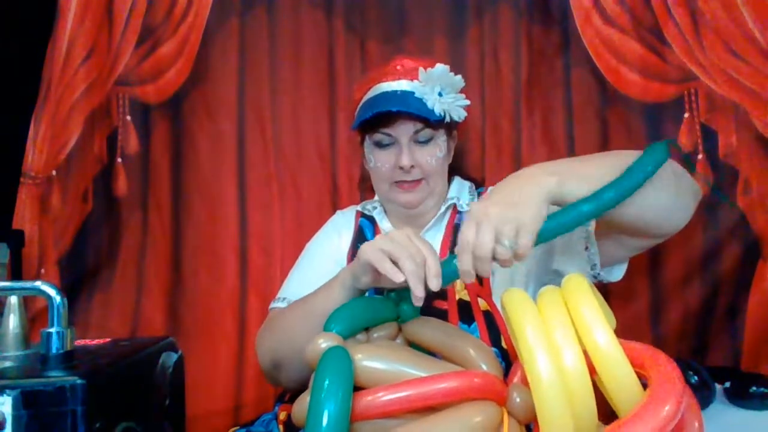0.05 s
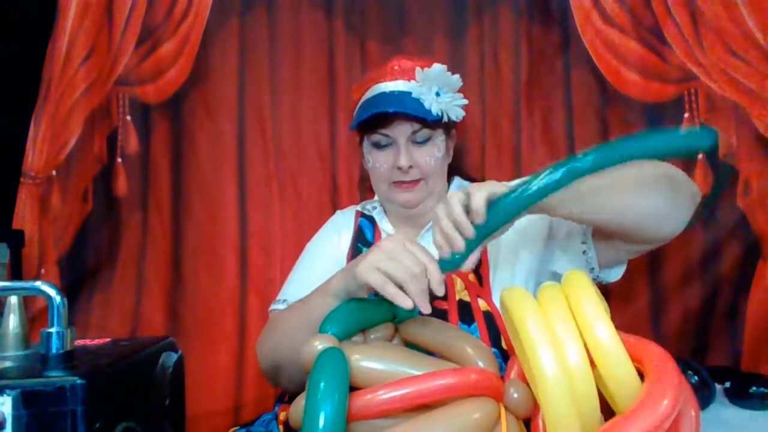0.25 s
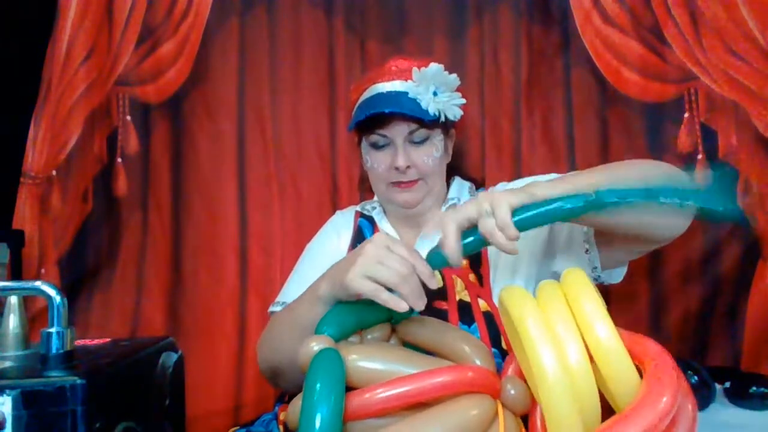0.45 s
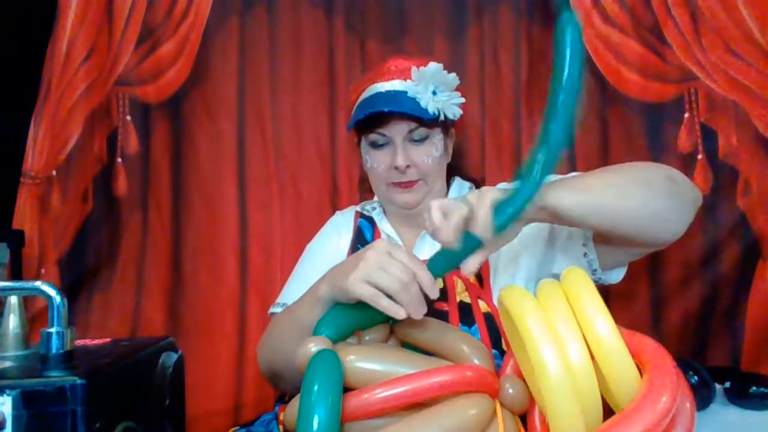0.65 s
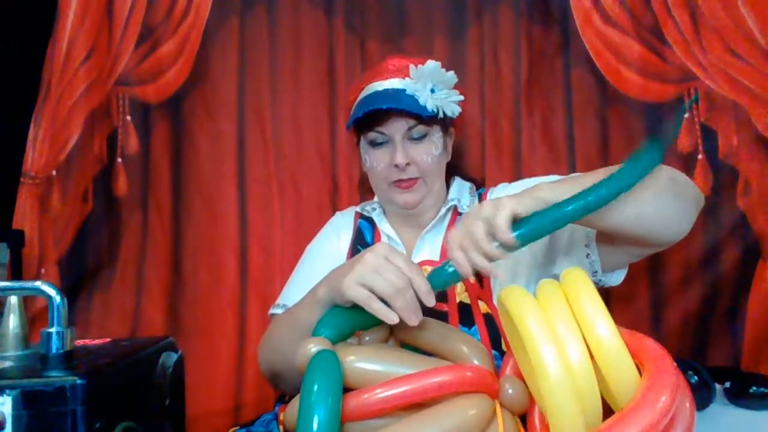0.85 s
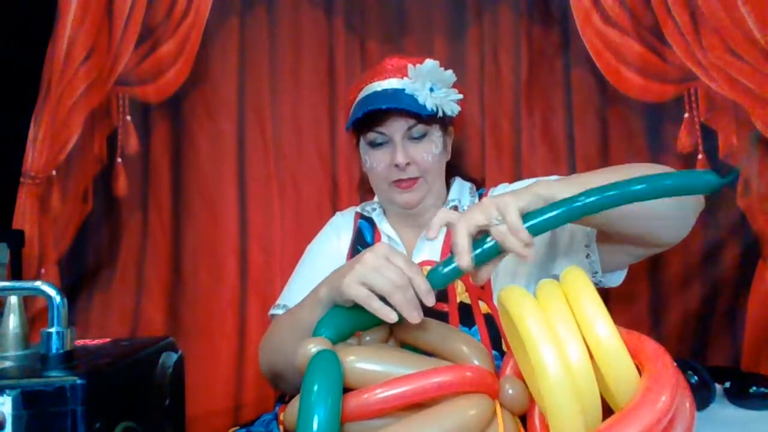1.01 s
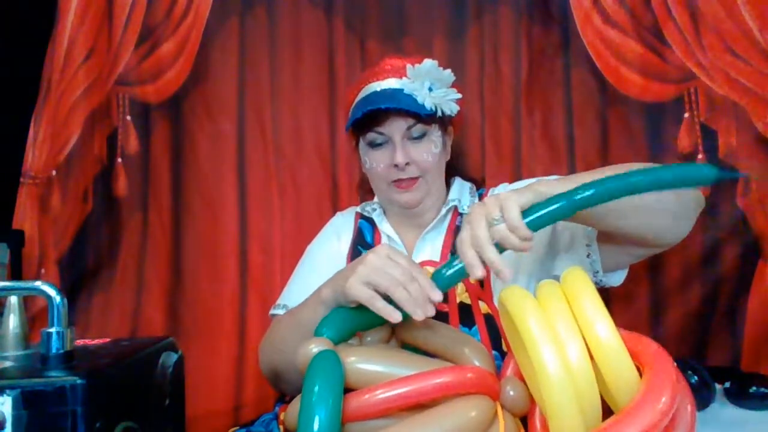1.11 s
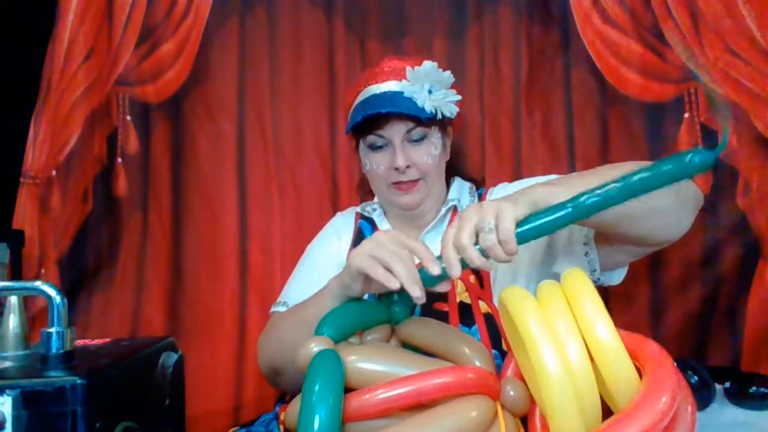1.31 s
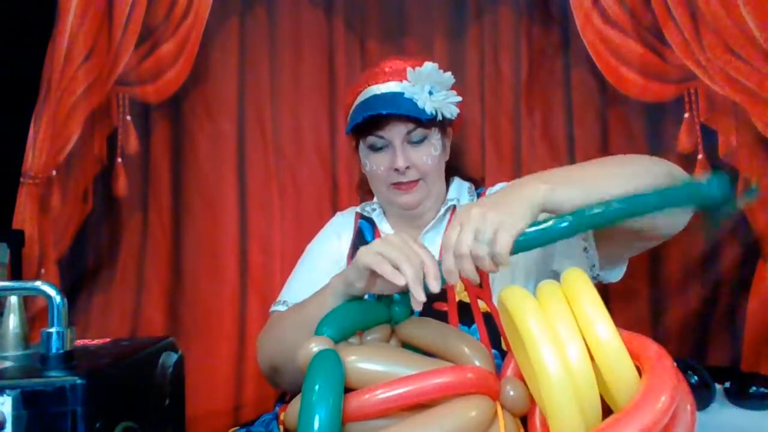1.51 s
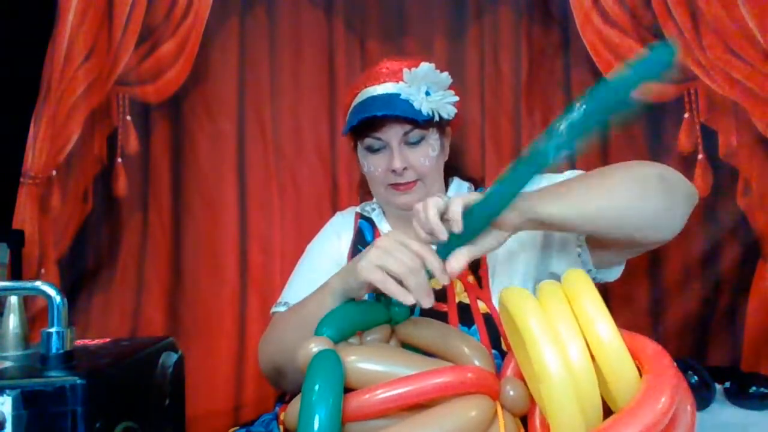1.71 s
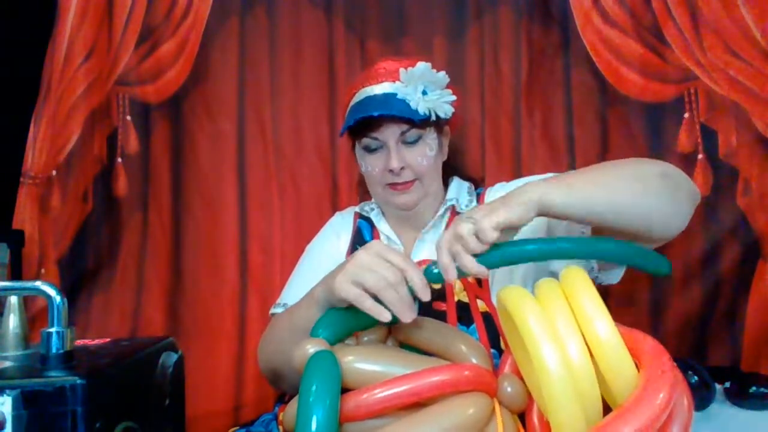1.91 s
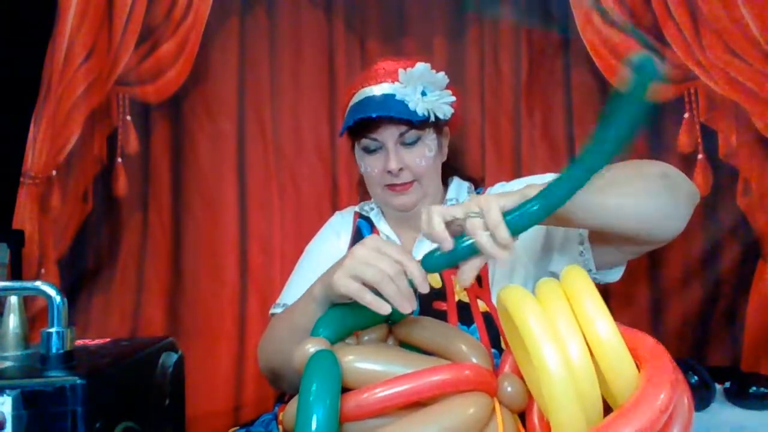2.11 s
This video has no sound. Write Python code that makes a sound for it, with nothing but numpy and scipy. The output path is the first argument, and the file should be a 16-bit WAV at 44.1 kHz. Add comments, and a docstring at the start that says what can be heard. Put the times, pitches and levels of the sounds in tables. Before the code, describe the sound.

Fingers drag and squeeze a tight latex balloon, rasping and crumpling; a sharp snap leads to a strong hollow pop-like slip, then a tiny squeak, uneven crackles and softer thumps, close and dry in a curtained room.

```python
"""A long latex balloon is squeezed and twisted close to a microphone in a small, curtained room.
Fingers drag over the skin from the start: many tiny filtered clicks make a grainy hiss, rasp and crumple.
Crackles (short noise bursts) soon join, then slips: pitched thumps with skin noise and duller bounces.
Next come a hard snap and the first hollow pings, both made of sine tones, and the loudest slip at 0.42 s.
A thin squeak of filtered noise passes at 0.85 s; more crackles and slips follow, and rubbing ends it."""
import sys
import numpy as np
from scipy import signal
from scipy.fft import rfft, irfft
from scipy.io import wavfile
from scipy.ndimage import uniform_filter1d

SR = 44100
rng = np.random.default_rng(int(sys.argv[2]) if len(sys.argv) > 2 else 0)


def transcribe(u):
    """Save the signal u as a 16-bit wav file named by the first command-line argument.

    u: samples, shape (n,) or (channels, n), limited to [-1, 1]; the rate is SR.
    q: integer samples, one column per channel.
    """
    v = np.clip(np.atleast_2d(u).T, -1, 1)
    q = np.round(v * 32767).astype(np.int16)
    wavfile.write(sys.argv[1], SR, q)


N = 94815  # length in samples, 2.15 s
TAPS = 4096  # samples in a colour filter
FREQS = np.fft.rfftfreq(TAPS, 1 / SR)

# faint hiss that differs between the ears: (frequency [Hz], relative level [dB])
SIDE_COLOUR = [(30, 8), (2500, -1.5), (16000, 9)]
SIDE_MAX_DB, SIDE_HALF_DB = -73, -70.0  # upper limit; loudness of the middle that gives half of it
FLOOR_DB = -94.5
ROOM_T60_S, ROOM_DB = 0.077, -15  # time to fade by 60 dB; level of the tail
BAND_LIMIT_HZ = 15900

# thin squeaks: (time [s], length [s], pitch [Hz], level [dB])
SQUEAKS = [(0.845, 0.0183, 8760, -41.5)]
SQUEAK_WIDTH_HZ = 2100

# pings of the air in the balloon: (time [s], level [dB], pitch [Hz], time to fade by 60 dB [s])
AIR_RINGS = [(0.368, -30.5, 509, 0.047), (.4202, -28.5, 2036, 0.15), (1.814, -41, 1790, 0.035),
             (1.8165, -44, 1993, 0.083), (1.8895, -33.5, 947, 0.043), (1.8925, -34.5, 2020, 0.047)]
RING_RISE_S = 0.001

# the rubbing over time: (time [s], hiss before its boost [dB], rasp [dB], low body [dB])
RUB_LEVELS = [(0.0, -54.5, -61, -90), (0.047, -57, -57, -54.5), (0.07, -71, -62, -65),
              (0.131, -57.5, -53, -52.5), (0.189, -60, -55, -53.5), (0.225, -55.5, -49.5, -45),
              (0.287, -44.5, -53.5, -76), (0.323, -70, -65, -69.5), (0.363, -57, -45, -55),
              (0.412, -57, -63.5, -60), (0.421, -53, -47, -41), (0.474, -57.5, -58, -50),
              (0.521, -50.5, -47.5, -50.5), (0.56, -59.5, -63.5, -101), (0.595, -51, -50, -88),
              (0.651, -72.5, -78.5, -78), (0.676, -56.5, -83, -64), (0.736, -55, -49.5, -61),
              (0.752, -60, -66, -80), (0.776, -100, -105, -91), (0.806, -54.5, -52.5, -51),
              (0.847, -48, -60, -73.5), (0.866, -60.5, -67, -81), (0.906, -46, -69, -88),
              (0.925, -61, -68.5, -50), (0.953, -57, -54, -60), (0.978, -79, -75.5, -70.5),
              (1.028, -57, -82, -100), (1.064, -66.5, -77.5, -84), (1.094, -92, -82, -76),
              (1.103, -54.5, -49.5, -49.5), (1.215, -49, -56, -54.5), (1.24, -69, -68.5, -111),
              (1.259, -57, -51.5, -54), (1.305, -55.5, -59.5, -109), (1.327, -64.5, -65.5, -77),
              (1.347, -55, -50.5, -53), (1.378, -49, -53.5, -55), (1.398, -61.5, -62.5, -89),
              (1.436, -74, -66, -95), (1.472, -52, -50, -98), (1.482, -64, -62.5, -91),
              (1.545, -63.5, -63, -58), (1.587, -49, -49.5, -49.5), (1.628, -55, -61.5, -74),
              (1.681, -43, -52, -83), (1.706, -61, -58, -55), (1.762, -54, -78, -73.5),
              (1.792, -70, -63.5, -61.5), (1.816, -53, -50.5, -49), (1.884, -74, -67.5, -68),
              (1.887, -72, -53, -42), (1.943, -60.5, -63, -73), (1.98, -58, -56, -54.5),
              (2.018, -61, -69, -99), (2.079, -76.5, -78, -83), (2.092, -60.5, -60, -64.5),
              (2.148, -64.5, -67, -72)]
HISS_BOOST_DB = 3.5
# hiss where finger meets skin: (frequency [Hz], relative level [dB])
HISS_COLOUR = [(1700, -21.5), (2500, 2.5), (3400, -3), (4600, -10), (5800, -17), (7200, -9.5), (8300, -3),
               (9700, 2), (11000, -9), (12600, 0.5), (14300, 4), (16000, -2.5)]
# rasp of the skin: (frequency [Hz], relative level [dB])
RASP_COLOUR = [(500, -40.5), (1000, -2.5), (1400, -6.5), (1750, 0.5), (2600, 0.5), (3800, -6.5),
               (5000, -11), (9500, -16), (16000, -32)]
# low body, before the bubble shapes it: (frequency [Hz], relative level [dB])
BODY_COLOUR = [(90, -25.5), (160, 1.5), (900, -3), (1500, -6.5), (4000, -47.5)]
# resonance of the pinched bubble, which follows the squeeze: (time [s], pitch [Hz])
BUBBLE_PITCH = [(0.05, 473), (0.22, 380), (0.5, 402.5), (1.105, 619.1), (1.13, 380), (1.17, 290),
                (1.215, 553), (1.265, 861), (1.34, 520), (1.55, 520), (1.59, 333), (1.71, 470),
                (1.86, 375.5), (2.11, 462)]
BUBBLE_WIDTH_HZ = 304
PATCH_DB = 2.3  # strength of the shifts in colour

# sharp, bright ticks: (time [s], level [dB])
SNAPS = [(0.2204, -26), (1.6741, -38)]
# tones within each snap: (frequency [Hz], relative level [dB])
SNAP_MODES = [(2400, -0.5), (3380, 0.5), (4480, -3), (5300, -7.5), (7900, -12), (9400, -4.5)]
SNAP_PEAK_S = 0.00075

# crackles: (time [s], level [dB], tilt above 2 kHz [dB per octave])
CRACKLES = [(0.0796, -45, 0), (0.1268, -35, 1), (0.14, -40, -1), (0.1766, -39, -4.5), (0.2055, -36.5, 4),
            (.2200, -25.5, 0), (0.2475, -32, 5), (0.3033, -39.5, -1.5), (0.3623, -28.5, 3.5),
            (0.42, -32, 6), (0.4854, -37.5, -6), (0.4926, -35.5, -3.5), (.588, -36.5, -5), (0.719, -32, 16),
            (1.135, -36.5, -2), (1.1389, -38.5, 3), (1.172, -44, -4), (1.2672, -34.5, 2), (1.2575, -43, -8),
            (1.2989, -38, 0.5), (1.351, -38, -7), (1.3558, -29, 2.5), (1.37, -39, -1.5),
            (1.4118, -37.5, 3.5), (1.4355, -32.5, 3.5), (1.4398, -31.5, 4), (1.4619, -33.5, -2),
            (1.5287, -36.5, -2), (1.5585, -33, -2.5), (1.6736, -33, 1), (1.6998, -35, 0.5),
            (1.8902, -34, -3)]
# crackles before the tilt: (frequency [Hz], relative level [dB])
CRACKLE_COLOUR = [(60, -49), (200, -31.5), (700, -10.5), (1300, 1.5), (2400, 5.5), (3600, -1), (5600, -2),
                  (9500, -0.5), (11000, -8), (13000, 0), (16000, -2)]
CRACKLE_RISE_S, CRACKLE_DECAY_S = 0.00015, 0.0011
CRACKLE_TAIL_S, CRACKLE_TAIL_DB = 0.011, -14.5
CRACKLE_CLICK = 3.0  # height of the first click over the burst that follows

# slips: (time [s], thump [dB], pitch [Hz], time to peak [s], skin noise [dB])
SLIPS = [(.1755, -38, 463, 0.0017, -41), (0.4199, -11, 560, 0.001, -25.5), (.6755, -34, 550, 0.0012, -46),
         (0.6992, -39, 594, 0.00063, -44), (.7195, -38.5, 690, 0.00314, -37),
         (0.7235, -23, 443, 0.002, -39), (0.729, -33, 243, 0.0033, -54), (0.8024, -29.5, 670, 0.0013, -40),
         (0.9233, -34.5, 595, 0.0019, -61), (0.9278, -41.5, 186, 0.004, -60.5),
         (1.1014, -30, 647, 0.002, -38.5), (1.162, -42.5, 300, 0.0041, -57.5),
         (1.4625, -44.5, 1270, 0.00062, -61), (1.558, -30, 568, 0.00265, -29),
         (1.8125, -28, 431.4, .0018, -42.5), (1.831, -40.5, 208, 0.00428, -52),
         (1.848, -39, 222, 0.00224, -46.5), (1.8922, -33, 570, .0027, -36.5),
         (1.902, -36.5, 286, 0.00344, -50), (1.967, -45, 360, 0.00337, -56.5)]
# skin noise of a slip: (frequency [Hz], relative level [dB])
SKIN_COLOUR = [(60, -33.5), (200, 2), (700, 1), (1400, -4.5), (2200, -4.5), (3200, -10), (5000, -21),
               (7000, -22), (9500, -15), (11000, -24), (15000, -14)]
SKIN_DECAY_S = 0.0056  # time to fall to 1/e
# bounces of each slip: (delay [s], level before dulling [dB])
BOUNCES = [(.0088, -24.5), (0.0123, -15), (.019, -24.5), (.0275, -28.5), (0.0398, -38.5)]
BOUNCE_HZ = 624  # bounces fade out above this


def amp(db):
    """Turns decibels into gain."""
    return 10 ** (np.asarray(db) / 20)


def unit(x):
    """Scales to an average (rms) strength of 1."""
    return x / np.sqrt(np.mean(x ** 2) + 1e-20)


def read(points, hz):
    """Reads a colour table between its points, on a log-frequency axis."""
    f, value = np.transpose(points)
    return np.interp(np.log(hz + 1), np.log(f + 1), value)


def add(mix, s, sound):
    """Mixes in a sound at time s, cut off at the end of the mix."""
    part = mix[max(round(s * SR), 0):][:len(sound)]
    part += sound[:len(part)]


def colour(x, db):
    """Filters with the given dB at FREQS; the filter has energy 1 and never acts ahead of time."""
    both_halves = np.r_[db, db[-2:0:-1]]
    # the Hilbert transform finds the phase that lets the filter respond at once
    response = np.exp(np.conj(signal.hilbert(np.log(amp(both_halves)))))
    h = irfft(response[:len(db)])
    return signal.fftconvolve(x, h / np.linalg.norm(h))[:len(x)]


def wander(rate_hz):
    """Smooth random ups and downs of rms 1, slower than about rate_hz."""
    spectrum = rfft(rng.standard_normal(N))
    slow = 1 + (np.fft.rfftfreq(N, 1 / SR) / rate_hz) ** 4
    return unit(irfft(spectrum / slow, N))


def grit(size):
    """Dense clicks of random sign and even strength."""
    return rng.choice([-1., 1.], size)


def low_cut(x, hz):
    """The balloon radiates little bass."""
    return signal.sosfilt(signal.butter(4, hz, "high", fs=SR, output="sos"), x)


def resonate(x, hz, width_hz):
    """A resonance whose pitch follows the curve hz."""
    turn = np.exp(2j * np.pi * np.cumsum(hz) / SR)
    r = np.exp(-np.pi * width_hz / SR)
    # shift the pitch down to zero, smooth, then shift it back up
    smoothed = signal.lfilter([1 - r], [1, -r], x / turn)
    return (turn * smoothed).real


def noise_floor():
    """A very faint, steady hiss, the same in both ears."""
    return amp(FLOOR_DB) * rng.standard_normal(N)


def side_hiss(mid):
    """A faint hiss that differs between the ears and sinks when the middle is quiet."""
    level = uniform_filter1d(abs(mid), size=900)  # average over 20 ms
    hiss = colour(rng.standard_normal(N), read(SIDE_COLOUR, FREQS))
    return amp(SIDE_MAX_DB) * hiss * level / (level + amp(SIDE_HALF_DB))


def room(x):
    """The curtains leave only a short, faint tail: noise that dies away."""
    t = np.arange(SR // 4) / SR
    tail = grit(len(t)) * np.exp(-np.log(1000) * t / ROOM_T60_S)
    tail = tail / np.linalg.norm(tail)
    return x + amp(ROOM_DB) * signal.fftconvolve(x, tail)[:N]


def squeaks():
    """A fingertip chatters briefly at a high, fuzzy pitch: noise around one frequency."""
    out = np.zeros(N)
    for s, length, hz, db in SQUEAKS:
        t = np.arange(0, length, 1 / SR)
        peak_db = -20 * np.log10(1 + (2 * (FREQS - hz) / SQUEAK_WIDTH_HZ) ** 2)
        tone = unit(colour(grit(len(t)), peak_db))
        add(out, s, amp(db) * tone * np.sin(np.pi * t / length))
    return out


def rings():
    """The enclosed air gives short hollow pings: sine tones that die away."""
    out, t = np.zeros(N), np.arange(SR // 4) / SR
    for s, db, hz, t60 in AIR_RINGS:
        fade = np.minimum(t / RING_RISE_S, 1) * np.exp(-np.log(1000) * t / t60)
        add(out, s, amp(db) * fade * np.sin(2 * np.pi * hz * t))
    return out


def shifting(x):
    """The colour shifts in random patches of time and pitch as the fingers move over the skin."""
    z = signal.stft(x, nperseg=256, noverlap=192)[2]
    patches = rng.standard_normal(z.shape)
    for _ in range(2):
        patches = uniform_filter1d(patches, size=5, axis=0)  # blur over pitch
        patches = uniform_filter1d(patches, size=14, axis=1)  # blur over time
    gain = unit(amp(PATCH_DB * unit(patches)))
    return signal.istft(z * gain, nperseg=256, noverlap=192)[1][:N]


def friction(spectrum, grip, per_s, spread_db, grip_db, smooth):
    """Tiny stick-slip releases of uneven size over a smooth slide, both stronger with more grip."""
    size = amp(spread_db * np.minimum(rng.exponential(1, N), 4))
    happens = rng.random(N) < per_s / SR
    grains = unit(grit(N) * size * happens)
    slide = smooth * rng.standard_normal(N)
    drive = (grains + slide) * amp(grip_db * grip)
    return unit(colour(drive, read(spectrum, FREQS)))


def rubbing():
    """Fingers drag on latex: hiss at the contact, rasp of the skin, hollow crumple in the pinched bubble."""
    s, *levels = np.transpose(RUB_LEVELS)
    t = np.arange(N) / SR
    hiss_gain, rasp_gain, body_gain = (amp(np.interp(t, s, level)) for level in levels)
    grip = wander(96)
    hiss = friction(HISS_COLOUR, grip, per_s=4800, spread_db=3.5, grip_db=3.0, smooth=0.7)
    rasp = friction(RASP_COLOUR, grip, per_s=700, spread_db=2.0, grip_db=2.5, smooth=0.51)
    flutter = friction(BODY_COLOUR, grip, per_s=680, spread_db=1.5, grip_db=1.5, smooth=0.65)
    bubble_hz = np.interp(t, *np.transpose(BUBBLE_PITCH))
    crumple = unit(resonate(flutter, bubble_hz, BUBBLE_WIDTH_HZ))
    return amp(HISS_BOOST_DB) * hiss_gain * hiss + rasp_gain * rasp + body_gain * crumple


def snaps():
    """A sharp, bright tick rings at several pitches at once for a few milliseconds."""
    out, t = np.zeros(N), np.arange(TAPS) / SR
    ring = sum(amp(db) * np.sin(2 * np.pi * (hz * t + rng.random())) for hz, db in SNAP_MODES)
    swell = t / SNAP_PEAK_S * np.exp(1 - t / SNAP_PEAK_S)
    for s, db in SNAPS:
        add(out, s, amp(db) * ring * swell)
    return out


def crackles():
    """Stuck latex snaps off a fingertip with a click and a burst of a few milliseconds."""
    out, t = np.zeros(N), np.arange(TAPS) / SR
    rise = np.minimum(t / CRACKLE_RISE_S, 1)
    burst = np.exp(-np.maximum(t - CRACKLE_RISE_S, 0) / CRACKLE_DECAY_S)
    tail = amp(CRACKLE_TAIL_DB) * np.exp(-t / CRACKLE_TAIL_S)
    shape = rise * (burst + tail)
    shape[0] = CRACKLE_CLICK
    octaves = np.log2(np.maximum(FREQS, 2000))
    for s, db, tilt in CRACKLES:
        crackle_db = read(CRACKLE_COLOUR, FREQS) + tilt * octaves
        add(out, s, amp(db) * colour(grit(len(t)) * shape, crackle_db))
    return out


def slips():
    """The twisted neck gives way: a hollow thump and a burst of skin noise, which bounce back duller."""
    blows, t = np.zeros(N), np.arange(SR // 4) / SR
    for s, thump_db, hz, peak_s, skin_db in SLIPS:
        swell = (t / peak_s * np.exp(1 - t / peak_s)) ** 2
        thump = swell * np.cos(2 * np.pi * hz * (t - peak_s))
        skin = colour(grit(len(t)) * np.exp(-t / SKIN_DECAY_S), read(SKIN_COLOUR, FREQS))
        add(blows, s, amp(thump_db) * thump + amp(skin_db) * skin)
    dull = signal.lfilter(*signal.butter(2, BOUNCE_HZ, fs=SR), blows)
    for delay, db in BOUNCES:
        add(blows, delay, amp(db) * dull)
    return low_cut(blows, hz=146)


def scene():
    """The balloon and its room straight ahead in mono, plus a faint hiss that differs between the ears."""
    skin = shifting(crackles() + rubbing())
    balloon = slips() + rings() + snaps() + squeaks() + skin
    mid = room(balloon) + noise_floor()
    side = side_hiss(mid)
    return np.array([mid + side, mid - side])


def record(dry):
    """The recorder's band limit takes away the highest treble."""
    low_pass = signal.firwin(401, BAND_LIMIT_HZ, window=("kaiser", 8), fs=SR)
    return signal.oaconvolve(dry, low_pass[None], "same")


dry = scene()
out = record(dry)
transcribe(out)
```